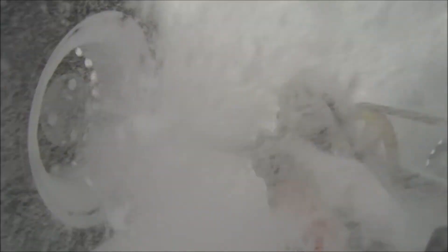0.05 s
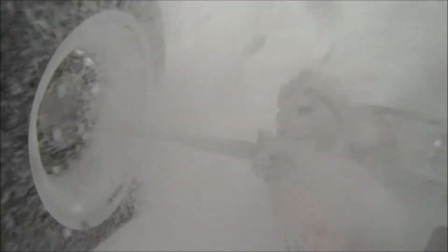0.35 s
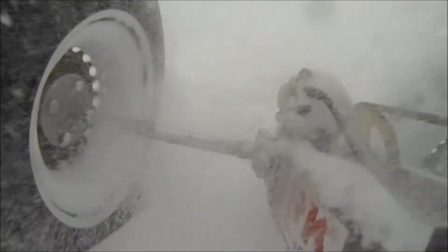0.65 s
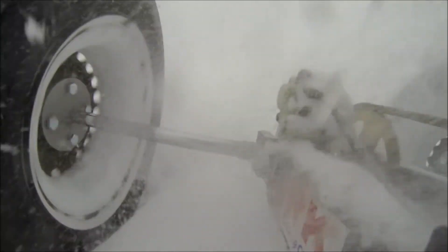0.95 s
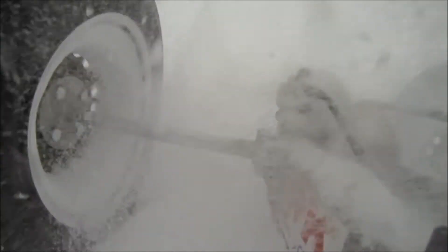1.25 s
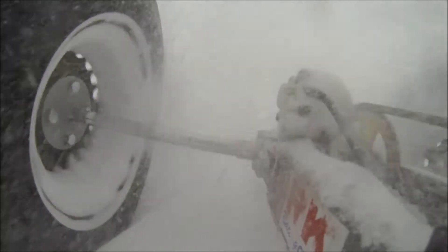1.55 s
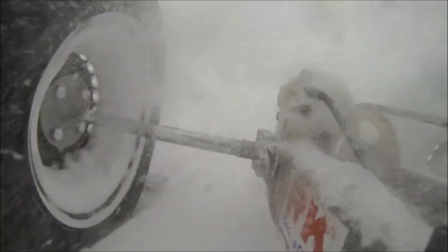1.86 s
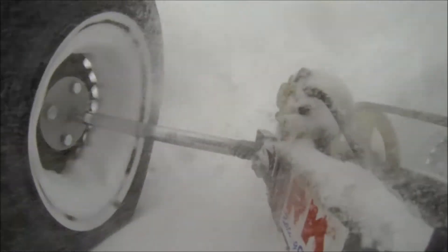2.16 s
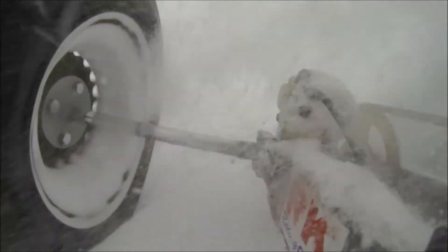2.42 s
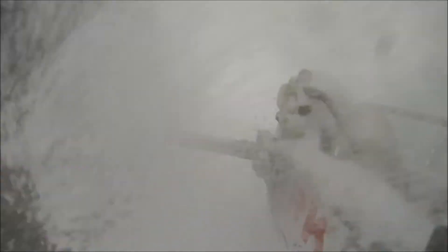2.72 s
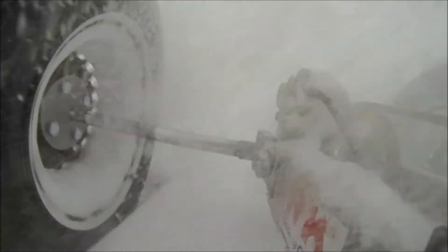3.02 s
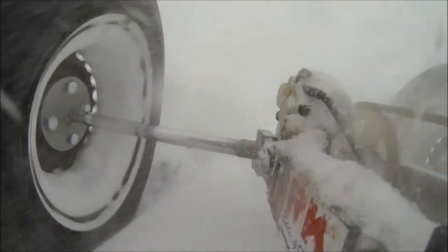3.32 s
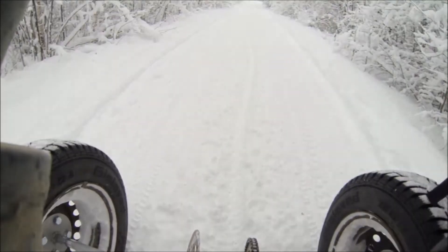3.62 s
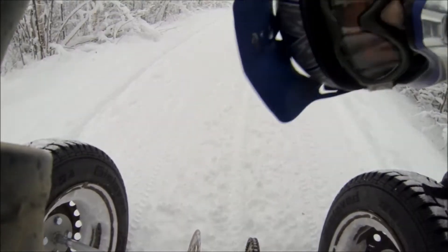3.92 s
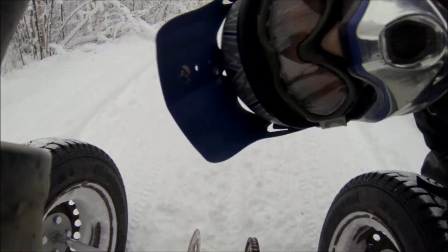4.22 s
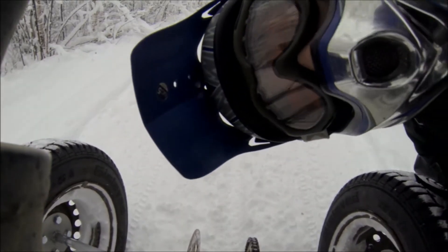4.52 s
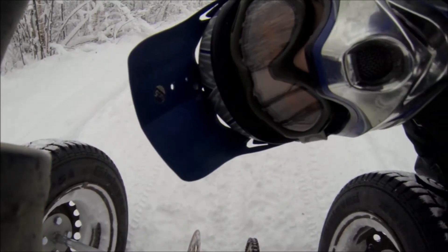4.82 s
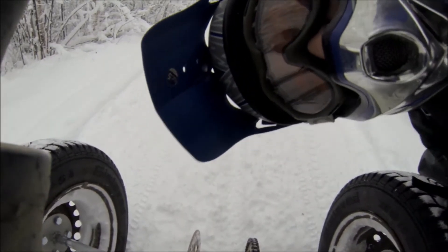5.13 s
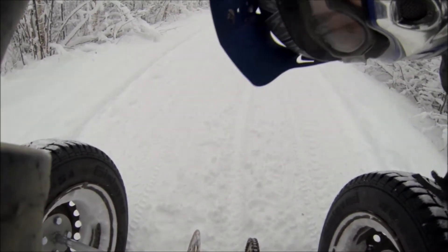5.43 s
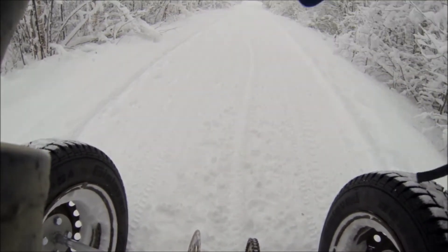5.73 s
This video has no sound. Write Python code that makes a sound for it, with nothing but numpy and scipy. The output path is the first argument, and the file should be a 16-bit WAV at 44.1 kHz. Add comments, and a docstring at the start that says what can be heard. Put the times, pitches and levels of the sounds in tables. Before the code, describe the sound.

Close to the back wheel, a small kart drives through snow, its four-stroke engine growling loudly, sputtering now and then and creeping up in pitch. The frame clanks over bumps while the tyres rumble and snow hisses faintly. Then the drive suddenly gives way to an even, low, thumping idle heard from the driver's seat, with soft hollow clatter and valve ticking.

```python
"""Single-cylinder four-stroke motorcycle engine in a home-built kart, driving through snow.
Beside the rear axle: hard exhaust pulses with occasional misfires, airbox honk, valve clatter, gear
whine, ringing steel, tyre roar, spray and frame rattles over bumps. Then, abruptly, from the seat:
the same engine idling with a round putter and light valve ticks. Engine sounds are clicks and noise
bursts timed by the firing cycle, shaped by pipe, airbox and casing resonances."""
import sys
import numpy as np
from scipy import signal
from scipy.fft import rfft, irfft, next_fast_len
from scipy.io import wavfile
from scipy.ndimage import uniform_filter1d

SR = 44100
rng = np.random.default_rng(int(sys.argv[2]) if len(sys.argv) > 2 else 0)


def put_to_file(sound):
    """Save the sound as 16-bit audio at rate SR, in the file named by the first command-line argument."""
    columns = np.atleast_2d(sound).T  # one column per channel
    safe = np.clip(columns, -1, 1)
    whole_steps = np.round(safe * 32767)
    wavfile.write(sys.argv[1], SR, whole_steps.astype(np.int16))


N = 258867
T = np.arange(N) / SR
SWITCH_S = 3.512  # axle to seat
DRIVE_SYNC_S, IDLE_SYNC_S = .0108, 3.5395  # time of one exhaust pulse

# engine speed, driving and idling: time_s, firing_hz
DRIVE_SPEED = [(0.0, 52.281), (0.54, 55.334), (0.831, 52.042), (1.573, 56.647), (1.985, 54.391),
               (2.372, 55.67), (2.521, 57.614), (2.586, 54.188), (3.086, 58.268), (3.38, 58.872),
               (3.51, 61.521)]
IDLE_SPEED = [(3.51, 21.957), (3.8, 22.53), (4.2, 22.56), (5.35, 23.39), (5.87, 22.64)]
# valve and piston knocks under load: cycle_share, level_db, decay_s
DRIVE_KNOCKS = [(-.09, -2, .005), (.02, 0, .006), (.29, -2, .006)]


def undb(db):
    """Decibels to gain."""
    return 10 ** (np.asarray(db) / 20)


def curve(table):
    """Linear interpolation over time."""
    return np.interp(T, *np.transpose(table))


def level(x, db, during=slice(None)):
    """Set the rms level, taken over all or part of the time."""
    return x * undb(db) / np.sqrt(np.mean(x[during] ** 2))


def noise():
    """White noise."""
    return rng.standard_normal(N)


def flutter(rate_hz, depth_db):
    """Gain wandering at random about 1."""
    hold = int(SR / rate_hz)
    steps = np.repeat(rng.standard_normal(N // hold + 1), hold)
    return undb(depth_db * uniform_filter1d(steps, hold)[:N])


def colour(x, outline):
    """Minimum-phase filter through (freq_hz, gain_db) points; -24 dB/octave beyond the ends."""
    size = next_fast_len(N + SR // 2) // 2 * 2
    hz, db = np.transpose(outline)
    octave = np.log2(np.maximum(np.arange(size // 2 + 1) * SR / size, 2))
    known = np.log2(hz)
    outside = np.abs(octave - np.clip(octave, known[0], known[-1]))
    gain_db = np.maximum(np.interp(octave, known, db) - 24 * outside, -90)
    cepstrum = irfft(np.log(undb(gain_db)))[:size // 2]
    cepstrum[1:] *= 2
    return irfft(rfft(x, size) * np.exp(rfft(cepstrum, size)))[:N]


def resonance(x, hz, width_hz):
    """One resonance, unity gain at centre."""
    return signal.lfilter(*signal.iirpeak(hz, hz / width_hz, SR), x)


def ring(x, modes):
    """Resonator bank with relative mode levels; unit rms."""
    return level(sum(level(resonance(x, hz, width_hz), db) for hz, width_hz, db in modes), 0)


def cycle_times(speed, sync_s, share=0):
    """Times at which the engine is a given share of a cycle past the exhaust pulse."""
    cycles = np.cumsum(curve(speed)) / SR
    cycles -= np.interp(sync_s, T, cycles) + share
    return np.interp(np.arange(np.ceil(cycles[0]), cycles[-1]), cycles, T)


def pulses(times_s, jitter_s, scatter_db):
    """Click train with random timing and strength."""
    timing, strength = rng.standard_normal((len(times_s), 2)).T
    at = np.clip((times_s + jitter_s * timing) * SR, 0, N - 1).astype(int)
    return np.bincount(at, undb(scatter_db * strength), N)


def bursts(clicks, decay_s):
    """Each click starts a decaying noise burst."""
    return signal.lfilter([1], [1, -np.exp(-1 / (decay_s * SR))], clicks) * noise()


def knocks(speed, sync_s, table, jitter_s, scatter_db):
    """Valves and piston knock at set points of each cycle; unit rms."""
    total = np.zeros(N)
    for share, db, decay_s in table:
        hits = pulses(cycle_times(speed, sync_s, share), jitter_s, scatter_db)
        total += undb(db) * bursts(hits, decay_s)
    return level(total, 0)


def tyre_roar():
    """Tyres roll through snow with a low roar."""
    roar = colour(noise(), [(22, -1), (60, -8), (160, -2), (260, 7.5), (600, -8)])
    return roar * flutter(16, depth_db=-.5)


def snow_spray(valves):
    """Hiss of snow thrown by the wheel, plus the treble of the valve knocks."""
    # spray spectrum: freq_hz, gain_db
    spectrum = [(4000, -16), (4500, -2.5), (5500, -16.5), (6300, 0), (6900, -7.5), (8000, -2),
                (9100, -11.5), (10500, -5), (11400, -17), (14000, -14.5), (15500, -30)]
    return colour(valves + undb(7) * noise() * flutter(200, depth_db=2.5), spectrum)


def frame_rattles():
    """Bumps shake the frame: each clanks, with a fainter clink that stands out more on light ones."""
    # bumps: start_s, level_db, length_s
    bumps = [(.005, -22, 0.023), (0.118, -23, .014), (.632, -22.5, 0.015), (1.137, -18.5, .022),
             (1.246, -20, 0.022), (1.49, -21, 0.016), (1.678, -24, 0.032), (1.813, -13.5, 0.013),
             (2.091, -23.5, 0.05), (2.255, -22, 0.012), (2.373, -17.5, 0.012), (2.439, -17.5, 0.023),
             (2.607, -19.5, .014), (2.773, -23, 0.03), (2.887, -19, 0.035), (3.233, -23, 0.016)]
    # frame modes, low and bright: pitch_hz, width_hz, level_db
    clank_modes = [(1330, 200, -3), (1640, 180, 0), (2150, 500, -6)]
    clink_modes = [(2900, 400, 0), (3780, 330, -2)]
    clink_offset_db, clink_db_per_db = -11.5, .73
    clank, clink, grit = np.zeros(N), np.zeros(N), noise()
    for start_s, db, length_s in bumps:
        progress = np.clip((T - start_s) / length_s, 0, 1)
        swell = np.sqrt(np.abs(np.sin(np.pi * progress)))
        clank += undb(db) * swell
        clink += undb(clink_offset_db + clink_db_per_db * db) * swell
    frame = clank * ring(grit, clank_modes) + clink * ring(grit, clink_modes)
    return colour(frame, [(700, 0), (2000, -.5), (3900, -3), (4700, -13)])


def steel_ring():
    """Engine knocks ring steel parts near the axle."""
    # steel modes: pitch_hz, width_hz, level_db
    modes = [(6320, 50, 1.5), (8200, 310, -9.5), (10140, 170, -12), (10860, 60, -13.5)]
    return ring(knocks(DRIVE_SPEED, DRIVE_SYNC_S, DRIVE_KNOCKS, jitter_s=.00046, scatter_db=4.5), modes)


def gear_whine(firing_hz):
    """Tooth tone tracks the engine and swells through the gearbox resonance."""
    teeth_per_cycle = 25
    tooth_hz = teeth_per_cycle * firing_hz * flutter(60, depth_db=.2)
    tone = np.sqrt(2) * np.sin(2 * np.pi * np.cumsum(tooth_hz) / SR)
    return undb(-28.5) * resonance(tone, hz=1326, width_hz=48) * flutter(25, depth_db=4)


def idle_mechanics(fired):
    """Piston churns through compression before each pulse; casing rings hollow, valves tick."""
    # valve and piston knocks: cycle_share, level_db, decay_s
    idle_knocks = [(-.17, -2, .003), (.03, 1, 0.0036), (0.191, -7, 0.0016), (.325, 5, 0.0014)]
    # clatter and tick spectra at the seat: freq_hz, gain_db
    clatter_spectrum = [(60, 6.5), (380, 4), (520, 5), (670, 2.5), (820, 5), (1080, 6), (1200, -1.5),
                        (1310, 4), (1800, -10.5), (2100, -4.5), (2370, -14), (2750, -7.5), (3400, -17),
                        (5000, -30.5)]
    tick_spectrum = [(1200, -10), (2500, 2), (4000, 1), (5500, -2), (6900, -2), (8000, 3), (9000, -8),
                     (10200, -7), (11500, -14), (15000, -24)]
    # casing and pipe modes: pitch_hz, width_hz, level_db
    modes = [(608, 20, -0.5), (784, 35, -0.5), (1291, 14, -1), (1523, 170, -2), (2060, 130, -13)]
    valves = knocks(IDLE_SPEED, IDLE_SYNC_S, idle_knocks, jitter_s=.0006, scatter_db=3.4)
    compression_s = cycle_times(IDLE_SPEED, IDLE_SYNC_S, share=-.17)
    strokes = pulses(compression_s, jitter_s=.00098, scatter_db=.55)
    churn = level(bursts(strokes, decay_s=.053), 0)
    clatter = colour(churn + undb(-14.5) * valves, clatter_spectrum)
    casing = colour(ring(level(fired, 0) + undb(1) * churn, modes), [(500, 0), (2000, 0)])
    ticks = colour(valves + undb(-8) * noise(), tick_spectrum) * flutter(9, depth_db=.8)
    return level(clatter, -29) + level(casing, -36.5) + level(ticks, -53.5)


def drive_mechanics(puffs, valves):
    """Gas rasps after each pulse over the valve clatter; pulses and knocks ring the casing."""
    # clatter spectrum at the axle: freq_hz, gain_db
    spectrum = [(600, 0.5), (850, -2), (1130, -4), (1320, -1), (1650, -0.5), (1850, -9), (2030, -9.5),
                (2330, -13.5), (2860, -10), (3700, -20), (5200, -37)]
    # casing and pipe modes: pitch_hz, width_hz, level_db
    modes = [(1308, 63, 11.5), (1545, 31, 5.5), (2013, 26, 2.5), (2860, 16, -4)]
    rasp = level(bursts(puffs, decay_s=.0042), -5) * flutter(50, depth_db=1.3)
    clatter = colour(rasp + undb(-8) * valves + undb(-4) * noise(), spectrum)
    casing = colour(ring(level(puffs, 0) + undb(-3) * valves, modes), [(1000, 0), (3000, 0)])
    return level(clatter, -21) + level(casing, -27.5)


def throttle(firing_hz):
    """Opening, 0-1: rises with engine speed and with acceleration."""
    coast_hz, span_hz, full_climb_hz_per_s, smooth_s = 54.5, 7.6, 23, .36
    climb_hz_per_s = uniform_filter1d(np.gradient(firing_hz) * SR, int(smooth_s * SR))
    return np.clip((firing_hz - coast_hz) / span_hz + climb_hz_per_s / full_climb_hz_per_s, 0, 1)


def intake_honk(opening):
    """Airbox honks once a cycle, misfire or not, harder with open throttle."""
    # one gulp of air: freq_hz, gain_db
    spectrum = [(150, -30), (195, -10.5), (222, 1), (275, -11.5), (325, -8.5), (355, -5), (400, -17.5)]
    full_throttle_db = 1.8
    gulps = pulses(cycle_times(DRIVE_SPEED, DRIVE_SYNC_S, share=.4566), jitter_s=.00008, scatter_db=1.74)
    return colour(gulps * undb(full_throttle_db * opening), spectrum)


def idle_exhaust(fired):
    """Round thumps; their upper part returns inverted from the open pipe end."""
    # one idle pulse: freq_hz, gain_db
    spectrum = [(20, -34.5), (46, -10), (69, -10), (115, 0.5), (138, -1), (215, -10.5), (255, -19.5),
                (300, -13), (400, -26), (475, -23.5), (660, -40), (810, -26), (1000, -56.5), (2500, -51)]
    echo_s = .012
    thump = colour(fired, spectrum)
    delayed = np.pad(thump, (int(echo_s * SR), 0))[:N]
    echo = undb(-4) * resonance(delayed, hz=449, width_hz=210)
    # the silencer delays the bass, so each pulse falls in pitch
    silenced = thump - 2 * resonance(thump, hz=80, width_hz=30)
    return echo - silenced


def drive_firings():
    """Click trains of the cycles that fire and those that misfire under load."""
    # misfires: time_s
    misfires_s = [0.79, 1.278, 1.636, 1.852, 1.906, 2.199, 2.325, 2.521, 2.592, 2.629, 2.792, 3.056, 3.193,
                  3.261]
    times_s = cycle_times(DRIVE_SPEED, DRIVE_SYNC_S)
    missed = np.isin(np.arange(len(times_s)), [np.argmin(np.abs(times_s - s)) for s in misfires_s])
    fired = pulses(times_s[~missed], jitter_s=.00011, scatter_db=.8)
    unburnt = pulses(times_s[missed] + .0003, jitter_s=.0001, scatter_db=1)
    return fired, unburnt


def drive_exhaust(fired, unburnt):
    """Hard pulses and unburnt puffs; uneven combustion makes the growl swell and break up."""
    # one fired pulse, one unburnt puff: freq_hz, gain_db
    fired_spectrum = [(25, -14), (54, 4), (112, 7.5), (165, -6), (225, 0), (280, 2.3), (370, 2), (440, 6.2),
                      (560, -.5), (680, -15), (950, -21.5), (1350, -14), (1650, -23), (2100, -38)]
    unburnt_spectrum = [(30, -41), (110, -22), (170, -10), (320, -9), (450, -3), (700, -16), (1500, -10),
                        (3800, -50)]
    gas = colour(fired, fired_spectrum) + colour(unburnt, unburnt_spectrum)
    return gas + (flutter(35, depth_db=1.3) - 1) * resonance(gas, hz=300, width_hz=160)


def idling():
    """Engine at idle, from the seat."""
    fired = pulses(cycle_times(IDLE_SPEED, IDLE_SYNC_S), jitter_s=.0001, scatter_db=.5)
    return level(idle_exhaust(fired), -13) + idle_mechanics(fired)


def driving():
    """Kart under load, from beside the rear axle."""
    full_throttle_treble_db = -2.5
    firing_hz = curve(DRIVE_SPEED)
    opening = throttle(firing_hz)
    fired, unburnt = drive_firings()
    exhaust = level(drive_exhaust(fired, unburnt), -16.5, during=T < SWITCH_S)
    valves = knocks(DRIVE_SPEED, DRIVE_SYNC_S, DRIVE_KNOCKS, jitter_s=.00038, scatter_db=2)
    mechanics = drive_mechanics(fired + unburnt, valves)
    tyres = level(tyre_roar(), -25.5)
    treble = level(snow_spray(valves), -44) + level(steel_ring(), -44.5)
    treble *= undb(full_throttle_treble_db * opening)
    intake = level(intake_honk(opening), -18, during=T < SWITCH_S)
    return exhaust + intake + mechanics + gear_whine(firing_hz) + treble + tyres + frame_rattles()


def scene():
    """Drive, then idle, with a small click at the switch."""
    click = undb(-22) * (np.arange(N) == int(SWITCH_S * SR))
    return (np.where(T < SWITCH_S, driving(), idling()) + click)[None]


def record(dry):
    """Soft peak limiter, then low-pass."""
    ceiling, cutoff_hz = .92, 15600
    rounded = dry / (1 + np.abs(dry / ceiling) ** 6) ** (1 / 6)
    return signal.sosfilt(signal.ellip(8, .2, 70, cutoff_hz, fs=SR, output="sos"), rounded)


dry = scene()
out = record(dry)
put_to_file(out)
```